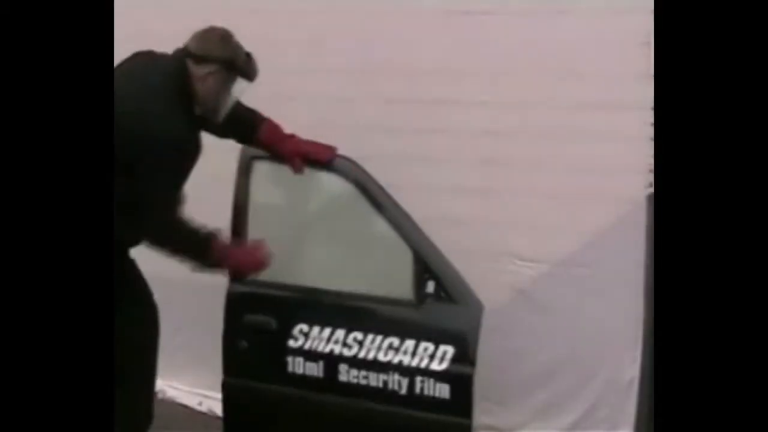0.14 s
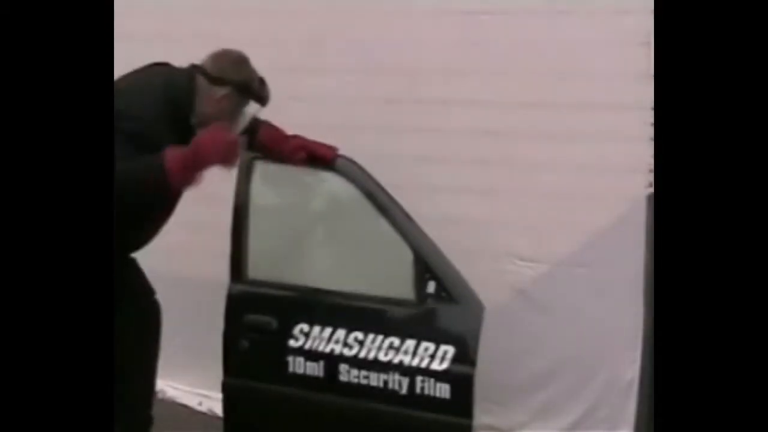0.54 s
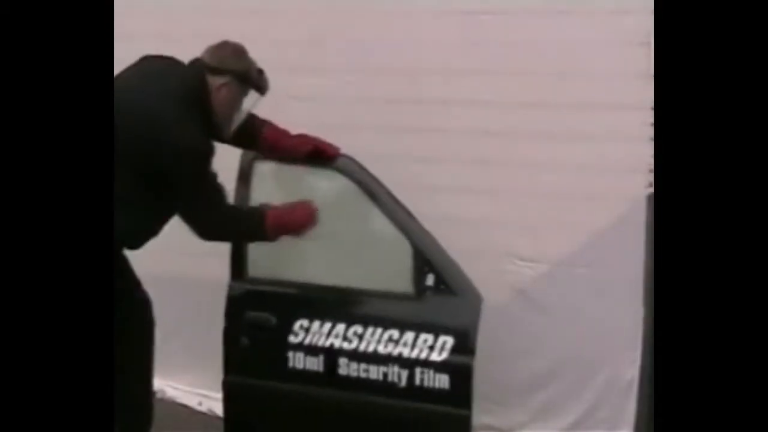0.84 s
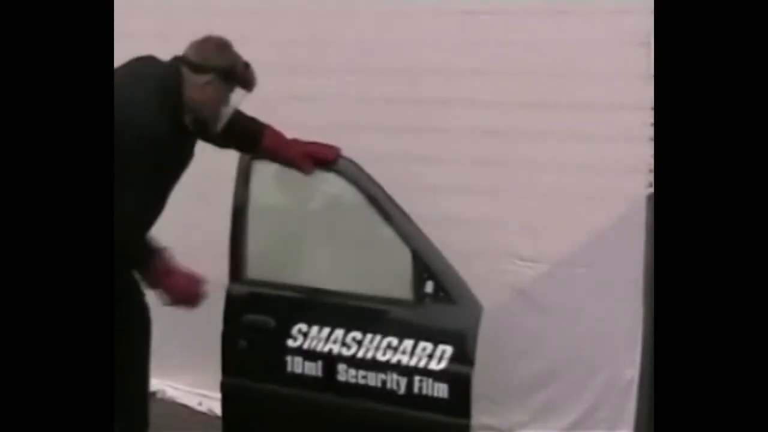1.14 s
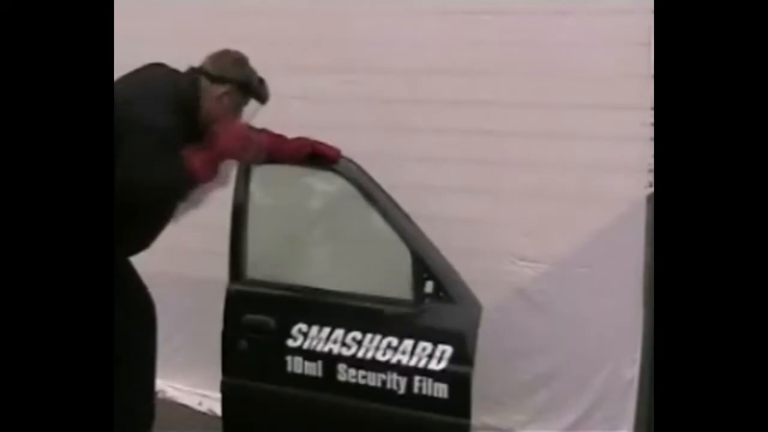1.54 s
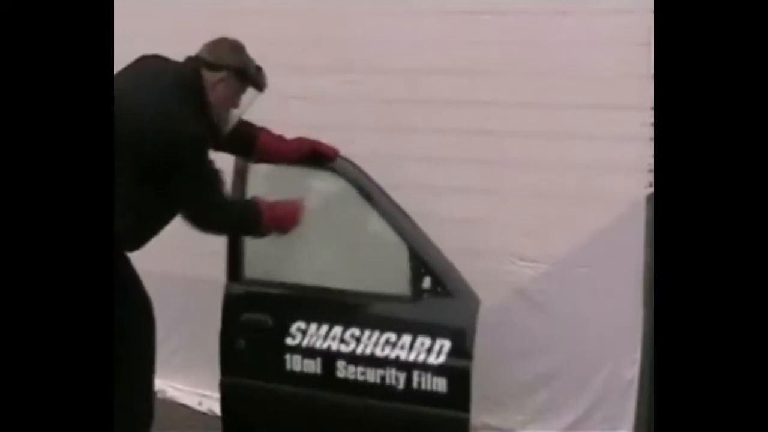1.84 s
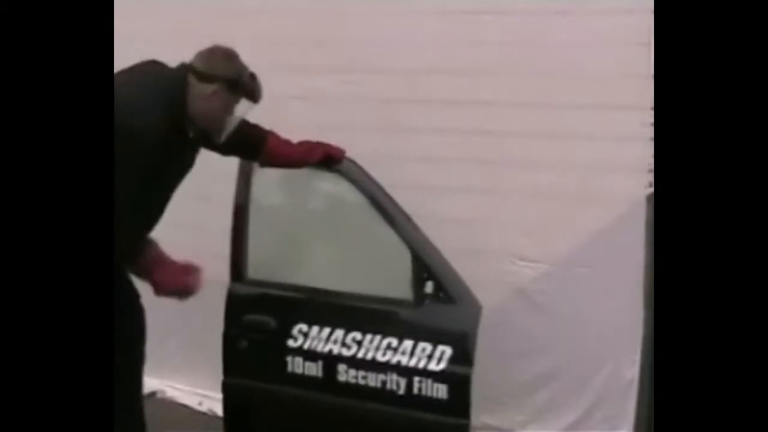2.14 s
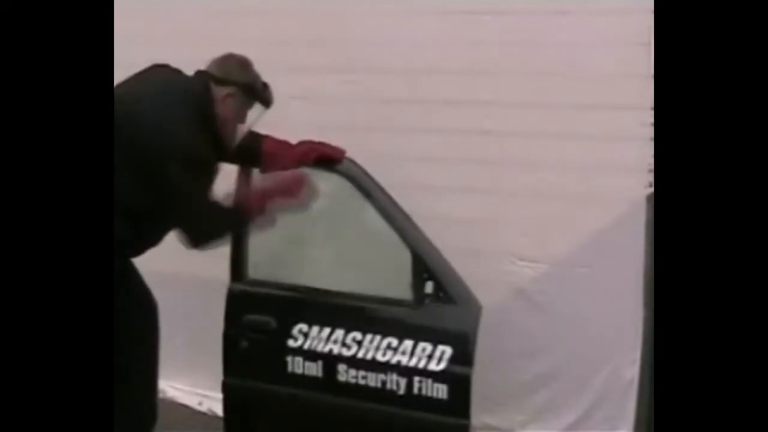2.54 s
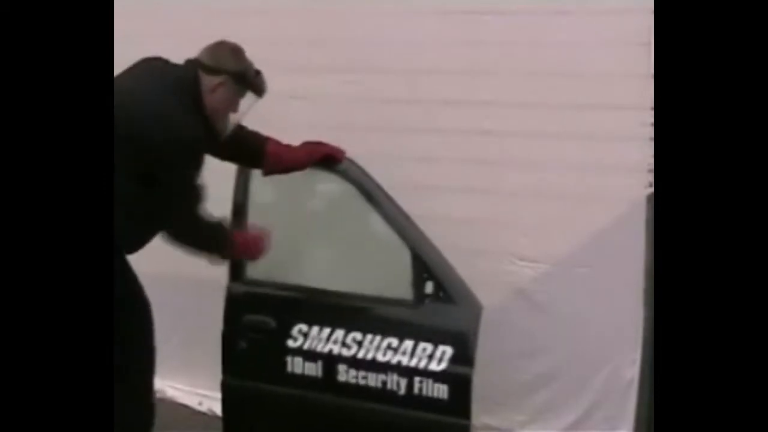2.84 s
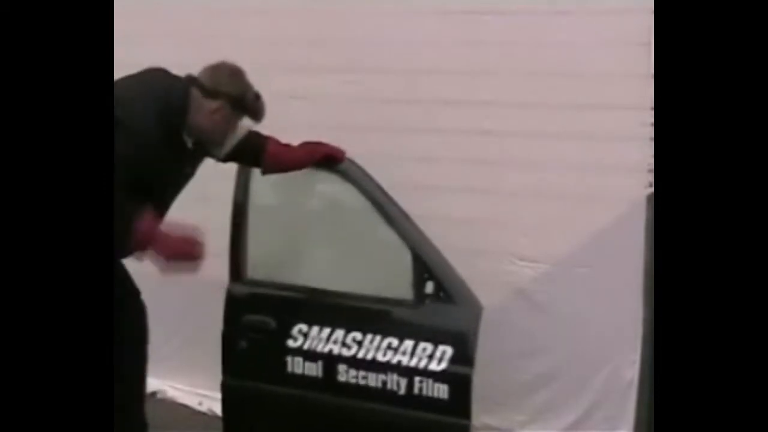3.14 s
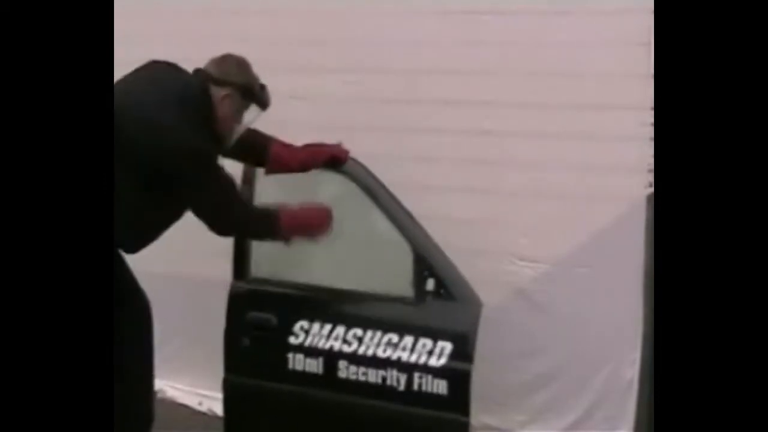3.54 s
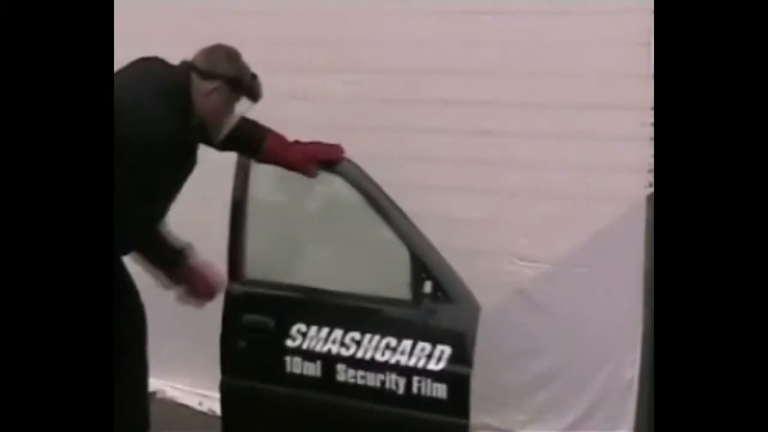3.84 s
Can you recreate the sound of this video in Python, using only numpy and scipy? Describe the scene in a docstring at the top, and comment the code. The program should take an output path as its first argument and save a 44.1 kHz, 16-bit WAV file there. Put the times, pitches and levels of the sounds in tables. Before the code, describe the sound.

A gloved fist pounds a loose car door's window in a hall, almost once a second. Each sharp crack brings a hollow boom, then glass grinds and rattles in its frame; close, slightly overloaded camera microphone.

```python
"""A blow's sharp crack is already dying away at the start; four more follow, in a hall, as a gloved fist strikes
the film-backed window of a loose car door. Each blow is a decaying burst of random contacts that rings the pane's
modes and booms the door; as the door rocks back, the glass grinds and rattles in its frame. Sleeves rustle and
small bits tick between blows, over hiss and the hum of the camera's drum. The camera notches a harmonic series
out of the sound and overloads smoothly on its peaks."""
import sys
import numpy as np
from scipy import signal
from scipy.fft import rfft, irfft, next_fast_len
from scipy.io import wavfile
from scipy.ndimage import map_coordinates

SR = 44100
rng = np.random.default_rng(int(sys.argv[2]) if len(sys.argv) > 2 else 0)


def wav_out(sig):
    """Save sig, one row per channel (or a flat mono array), as 16-bit PCM at SR to the path in sys.argv[1]."""
    wavfile.write(sys.argv[1], SR, np.round(np.clip(np.atleast_2d(sig).T, -1, 1) * 32767).astype(np.int16))


N = 176400
TOP_HZ = 12371  # upper band limit

# The blows of the fist. Each row: start in seconds, then levels in dB of the crack, pane ring, door boom,
# frame knock and rattle, and the delay of the rattle's peak in seconds.
BLOWS = [(-.03, -3, -16, -18, -10.5, -21, 0.2), (0.8859, -2, -14.5, -17, -7.5, -17, 0.24),
         (1.7957, -1.5, -16.5, -21.5, -12.5, -19, 0.26), (2.7197, -2, -17, -15.5, -2.5, -20, .22),
         (3.6304, -1.5, -16, -18, -6.5, -18, 0.23)]


def amp(db):
    """Level law: decibels to an amplitude ratio."""
    return 10 ** (np.asarray(db) / 20)


def unit(x):
    """Power normalisation: scale to rms 1."""
    return x / np.sqrt(np.mean(x ** 2) + 1e-20)


def along(points, hz):
    """Logarithmic frequency scale: interpolate (Hz, value) points at hz."""
    f, v = np.transpose(points)
    return np.interp(np.log(hz + 1), np.log(f + 1), v)


def since(s):
    """Time origin: seconds since s, for every sample."""
    return np.arange(N) / SR - s


def fade(s, t60):
    """Exponential decay after a sudden start at s, losing 60 dB in t60 seconds."""
    t = since(s)
    return (t >= 0) * np.exp(-np.log(1000) * np.abs(t) / t60)


def swell(s, rise, t60):
    """Gradual excitation: a bell-shaped rise to s, then an exponential decay."""
    t = since(s)
    return (t < 0) * np.exp(-(t / rise) ** 2) + fade(s, t60)


def wobble(rate):
    """Slow random modulation: a smooth curve through rate random knots a second."""
    knots = rng.standard_normal(2000)
    return map_coordinates(knots, [np.arange(N) * rate / SR], mode="wrap")


def grains(rate, scatter_db):
    """Shot noise: random tiny contacts, rate a second, of scattered size and either sign."""
    struck = rng.random(N) < rate / SR
    sign = np.sign(rng.standard_normal(N))
    size = amp(scatter_db * np.clip(rng.standard_normal(N), -2, 2))
    return unit(struck * sign * size)


def filtered(x, response):
    """Linear filtering: multiply the spectrum by a complex response of frequency."""
    m = 2 * next_fast_len(N * 2 // 3)
    return irfft(rfft(x, m) * response(np.fft.rfftfreq(m, 1 / SR)), m)[..., :N]


def coloured(x, level):
    """Minimum phase: a causal filter of unit power, whose level gives dB for each frequency."""
    def response(hz):
        magnitude = unit(amp(level(hz)) * np.where(hz < TOP_HZ, 1, .1))
        cepstrum = irfft(np.log(magnitude + 1e-6))
        # Folding the cepstrum onto positive times makes the filter causal.
        cepstrum[1:len(cepstrum) // 2] *= 2
        cepstrum[len(cepstrum) // 2 + 1:] = 0
        return np.exp(rfft(cepstrum))
    return filtered(x, response)


def through_glass(x, spectrum):
    """Resonance: contacts of a given spectrum are coloured by the modes of glass and frame."""
    # Resonances of glass and frame. Each row: frequency in Hz, width in Hz, boost in dB.
    resonances = [(365, 89, 2), (513, 45, 5.5), (770, 98, 4.5), (1090, 52, 3), (1435, 87, 2),
                  (1653, 34, 2.5), (2070, 77, -1), (2210, 110, 2), (2590, 72, 0.5), (3560, 125, 5.5),
                  (3580, 46, -7), (4750, 190, 2), (5300, 63, 2.5), (5800, 54, 6)]

    def level(hz):
        peaks = sum(db / (1 + (2 * (hz - f) / width) ** 2) for f, width, db in resonances)
        return along(spectrum, hz) + peaks
    return coloured(x, level)


def cracks():
    """Impact: the glove lands, the glass cracks and knocks on its frame, and door and pane shudder on."""
    # Spectra of crack, frame knock and shudder. Each row: frequency in Hz, level in dB per Hz.
    crack_spectrum = [(30, -27), (100, -5), (300, -12), (600, -10), (1100, -8.5), (2200, -6), (3500, -10.5),
                      (5500, -9.5), (7200, -17), (12000, -22.5)]
    knock_spectrum = [(200, -7), (360, 0), (550, -17.5), (750, 2), (1050, 0.5), (1400, -1), (2000, -10.5),
                      (5000, -43)]
    shudder_spectrum = [(60, -18.5), (200, 1), (420, 4.5), (700, -0.5), (1200, -6), (2500, -8.5),
                        (5500, -16), (7500, -25), (12000, -35.5)]
    crack_t60_s, knock_t60_s, shudder_t60_s = 0.079, 0.12, 0.63
    touch_s, touch_db = 0.0029, -18  # the glove lands this long before the blow
    shudder_db = -10  # against the crack
    burst, knock, shudder = np.zeros((3, N))
    for s, crack_db, _, _, knock_db, *_ in BLOWS:
        touch = amp(touch_db) * fade(s - touch_s, crack_t60_s)
        burst += amp(crack_db) * (fade(s, crack_t60_s) + touch)
        knock += amp(knock_db) * fade(s, knock_t60_s)
        shudder += amp(crack_db + shudder_db) * fade(s, shudder_t60_s)
    return (through_glass(burst * grains(rate=13000, scatter_db=0), crack_spectrum)
            + through_glass(knock * grains(rate=4600, scatter_db=5), knock_spectrum)
            + through_glass(shudder * grains(rate=3000, scatter_db=0), shudder_spectrum))


def pane():
    """Modal vibration: every blow rings the same bending modes, each time a little differently."""
    # Low modes of the pane. Each row: frequency in Hz, level in dB, 60 dB decay time in seconds.
    modes = [(228.3, -9, 0.71), (338, -3, 0.14), (394, -9, 0.23), (463, 5, 0.17), (495.3, -1.5, 0.57),
             (524.3, 5, 0.15), (715.5, 3, 0.16), (748, -7, 0.1), (988, 3, 0.1), (1090, -13, .22),
             (1460, -40, 0.3)]
    out = np.zeros(N)
    for s, _, ring_db, *_ in BLOWS:
        t = since(s)
        live = (t >= 0) & (t < 1)
        t = t[live]
        variations = rng.standard_normal((len(modes), 3))
        for (hz, mode_db, t60), (size, tune, turn) in zip(modes, variations):
            decay = amp(ring_db + mode_db + 1.5 * size) * np.exp(-np.log(1000) * t / t60)
            cycles = hz * (1 + 0.0067 * tune) * t + turn
            out[live] += decay * np.sin(2 * np.pi * cycles)
    return out


def door():
    """Cavity and panel resonance: the hollow door thumps at a blow, booms as it rocks, mostly to the right."""
    # Booming modes. Each row: frequency in Hz, width in Hz, level in dB at the blow, level in dB rocking back.
    booms = [(32, 34, -16, -24), (61, 38, -12, -13.5), (84.4, 14, -6.5, -6), (111.7, 37, -6.5, -8),
             (138.3, 24, -14, -1.5), (168.4, 16, -10, -8), (218, 41, -15.5, -15)]
    # The door rocks back. Each row: peak time in seconds, rise in seconds, boom level in dB.
    rocks = [(.11, .03, -15), (.19, .04, -22.5), (.39, 0.032, -31.5), (1.039, 0.032, -16),
             (1.135, 0.021, -23), (1.28, 0.047, -34), (2.03, 0.13, -19.5), (2.88, .05, -17.5),
             (2.95, 0.024, -25), (3.79, 0.032, -14), (3.91, .04, -23.5)]
    # Left boom against the right. Each row: frequency in Hz, level in dB, phase lead in radians.
    left_table = np.array([(30, 4, -2.5), (55, -1, -3), (85, -10.5, -3), (114, -13, -2), (135, -11, -0.6),
                           (174, -5, -4.6), (225, -2.5, -1)])
    boom_t60_s, rock_t60_s = 1, 0.6
    thump_db, thump_t60_s = 10.5, 0.31  # level against the boom
    spread_db = -27.5  # independent boom at the left
    struck = sum(amp(db) * (fade(s, boom_t60_s) + amp(thump_db) * fade(s, thump_t60_s))
                 for s, _, _, db, *_ in BLOWS)
    rocked = sum(amp(db) * swell(s, rise, rock_t60_s) for s, rise, db in rocks)
    out = np.zeros((2, N))
    for f, width, hit_db, rock_db in booms:
        noise = rng.standard_normal((2, N))
        ring = unit(filtered(noise, lambda hz: 1 / (1 + (2 * (hz - f) / width) ** 2)))
        out += ring * np.hypot(amp(hit_db) * struck, amp(rock_db) * rocked)
    right, independent = out

    def left_response(hz):
        gain = amp(along(left_table[:, :2], hz))
        phase = along(left_table[:, ::2], hz)
        return gain * np.exp(1j * phase)
    left = filtered(right, left_response)
    return np.array([left + amp(spread_db) * independent, right])


def rattle():
    """Intermittent contact: the loose pane chatters in its frame, clacks, and in bursts grinds and clunks."""
    # Grinding bursts. Each row: peak time in seconds, rise in seconds, grinding level in dB,
    # level in dB of the pane's clunk on its frame, frequency in Hz that the rubbing spot favours.
    grinds = [(.11, .02, -20, -45, 3500), (0.157, 0.047, -15.5, -43, 2770), (0.23, 0.039, -17, -20.5, 1850),
              (.36, .02, -31, -32, 2800), (1.049, 0.016, -21.5, -34, 5000), (1.116, 0.014, -24, -23, 2700),
              (1.162, 0.022, -15.5, -23, 2070), (1.302, 0.053, -28.5, -32, 2510),
              (1.982, 0.046, -16.5, -30, 3200), (2.034, 0.028, -15, -17, 1510),
              (2.1, 0.014, -20, -28, 3580), (2.166, 0.024, -26.5, -28, 2490),
              (2.939, 0.014, -18, -24, 2330), (2.986, 0.011, -14.5, -18.5, 3630),
              (3.08, 0.018, -39, -30, 1400), (3.853, .015, -27, -39, 5010),
              (3.896, 0.018, -16, -18.5, 3160)]
    # Clacks of pane on frame. Each row: start in seconds, level in dB.
    clack_hits = [(.101, -18), (0.2203, -14.5), (1.034, -16), (1.1095, -13), (1.1439, -17), (1.872, -15),
                  (2.01, -11.5), (2.7965, -17.5), (2.9164, -21), (2.9796, -20), (3.706, -17)]
    # Spectra of rattle and clunk. Each row: frequency in Hz, level in dB per Hz.
    rattle_spectrum = [(80, -18.5), (250, -2.5), (450, -1), (900, -6.5), (1700, -4.5), (3000, -4),
                       (5500, -7), (7200, -15.5), (9500, -18), (12000, -29)]
    clunk_spectrum = [(150, -17), (380, -3), (560, -11.5), (760, 0.5), (950, -5.5), (1450, -2.5),
                      (2100, -4.5), (3500, -16), (7000, -50)]
    rattle_rise_s, rattle_t60_s = 0.11, 0.51
    clack_t60_s, grind_t60_s = 0.048, 0.17
    broad_gain, spot_gain, spot_q = 0.85, 0.78, 3.9
    clumps = amp(3 * wobble(rate=110))  # splinters catch and slip in clumps
    splinters = unit(clumps * grains(rate=7000, scatter_db=2.5))
    chatter = sum(amp(db) * swell(s + lag, rattle_rise_s, rattle_t60_s) for s, *_, db, lag in BLOWS)
    clacks = sum(amp(db) * fade(s, clack_t60_s) for s, db in clack_hits)
    contacts = np.hypot(chatter, clacks) * grains(rate=4000, scatter_db=3)
    clunk = np.zeros(N)
    for s, rise, grind_db, clunk_db, hz in grinds:
        envelope = swell(s, rise, grind_t60_s)
        burst = amp(grind_db) * envelope * splinters
        spot = signal.lfilter(*signal.iirpeak(hz, spot_q, SR), burst + 1e-20)
        contacts += broad_gain * burst + spot_gain * spot
        clunk += amp(clunk_db) * envelope
    clunk_contacts = clunk * grains(rate=700, scatter_db=3)
    return through_glass(contacts, rattle_spectrum) + through_glass(clunk_contacts, clunk_spectrum)


def floor():
    """Stationary noise and a pure tone: steady air and hiss, and the hum of the camera's drum."""
    # Spectrum of air and hiss. Each row: frequency in Hz, level in dB per Hz.
    floor_spectrum = [(12, -59), (20, -6), (88, 4.5), (243, 0.5), (301, -0.5), (515, -1.5), (589, -0.5),
                      (655, -2.5), (904, -5.5), (1630, -8.5), (2720, -12.5), (5320, -24), (12200, -33),
                      (15900, -83), (22000, -120)]
    floor_db, side_db = -41, -8.5  # side against mid
    hum_hz, hum_db = 149.9, -53.5
    mid, side = coloured(rng.standard_normal((2, N)), lambda hz: along(floor_spectrum, hz))
    air = mid + amp(side_db) * side * np.array([[1], [-1]])
    hum = np.sin(2 * np.pi * hum_hz * since(0))
    return amp(floor_db) * air + amp(hum_db) * hum


def sleeves():
    """Friction noise: cloth rustles unevenly as the arm swings up again after a blow."""
    # Spectrum of the cloth. Each row: frequency in Hz, level in dB per Hz.
    rustle_spectrum = [(120, -44), (200, -7), (250, 0), (292, -16.5), (524, -4.5), (909, -5), (1040, -4.5),
                       (1630, -5), (3420, -16), (5170, -14), (12200, -38.5), (15900, -61), (22000, -120)]
    delay_s, width_s, rustle_db = 0.69, 0.24, -37.5  # delay from blow to fullest rustle
    swing = sum(np.exp(-(since(s + delay_s) / width_s) ** 2) for s, *_ in BLOWS)
    folds = unit(amp(3.6 * wobble(rate=26)) * grains(rate=2500, scatter_db=2))
    return amp(rustle_db) * coloured(swing * folds, lambda hz: along(rustle_spectrum, hz))


def ticks():
    """Stress release: settling glass and frame give small snaps, each with a short crackle."""
    # Snaps of glass and frame. Each row: start in seconds, level in dB.
    snaps = [(0.451, -38), (.652, -36), (.7114, -37), (0.7643, -29), (0.7894, -33), (0.8352, -33.5),
             (1.3904, -27), (1.4667, -30), (1.552, -28.5), (1.6156, -35), (1.6783, -33.5), (1.7077, -26.5),
             (1.761, -30), (2.3, -36.5), (2.4, -36.5), (2.562, -37.5), (2.5937, -35), (3.3005, -32),
             (3.327, -34), (3.5185, -26.5), (3.5929, -21.5)]
    # Spectrum of a tick. Each row: frequency in Hz, level in dB per Hz.
    tick_spectrum = [(100, -30), (500, 1), (1500, 2.5), (3500, -4.5), (5800, -9.5), (7500, -22),
                     (12000, -26)]
    crackle_t60_s = 0.028
    snap_db, snap_t60_s = 3.5, 0.01  # level against the crackle
    level = sum(amp(db) * (fade(s, crackle_t60_s) + amp(snap_db) * fade(s, snap_t60_s)) for s, db in snaps)
    return through_glass(level * grains(rate=9000, scatter_db=0.5), tick_spectrum)


def hall(x):
    """Reverberation: convolution with a noise tail whose decay time depends on frequency."""
    # Decay of the hall. Each row: frequency in Hz, 60 dB decay time in seconds.
    decay_times = [(100, 1), (1000, 1), (4000, 0.48), (12000, 0.54)]
    hz, t, z = signal.stft(rng.standard_normal(SR), SR, nperseg=256)
    decay = np.exp(-np.log(1000) * t / along(decay_times, hz)[:, None])
    tail = signal.istft(z * decay, SR, nperseg=256)[1]
    return signal.fftconvolve(x, tail / np.linalg.norm(tail))[:N]


def widened(x):
    """Decorrelation: early echoes from wall and floor differ between the two microphones."""
    # Stereo width. Each row: frequency in Hz, side level in dB.
    side_levels = [(200, -7), (500, -14), (1000, -15), (2200, -18.5), (4000, -40), (10000, -49)]
    echoes = rng.standard_normal(N) * fade(0, t60=0.036)
    echoed = signal.fftconvolve(x, echoes / np.linalg.norm(echoes))[:N]
    side = filtered(echoed, lambda hz: amp(along(side_levels, hz)))
    return np.array([x + side, x - side])


def scene():
    """Superposition: the window near the centre with its hall, the door's boom and the steady floor."""
    window = cracks() + pane() + rattle() + sleeves() + ticks()
    balance = amp([[.3], [-.3]])  # dB, left and right
    return widened(window + amp(-14) * hall(window)) * balance + door() + floor()


def record(dry):
    """Comb filtering, saturation and band limiting: the camera's notches, overload and upper limit."""
    notch_hz = 299.7  # notches at 0 Hz and every multiple of this, twice the drum's hum
    narrowness, depth = 0.62, 0.74  # 0 to 1
    clip_level = .98

    def comb(hz):
        z = np.exp(-2j * np.pi * hz / notch_hz)
        full_notch = (1 + narrowness) / 2 * (1 - z) / (1 - narrowness * z)
        return 1 + depth * (full_notch - 1)
    x = filtered(dry, comb)
    x = x / (1 + (x / clip_level) ** 6) ** (1 / 6)
    return filtered(x, lambda hz: 1 / np.sqrt(1 + (hz / TOP_HZ) ** 120))


dry = scene()
out = record(dry)
wav_out(out)
```